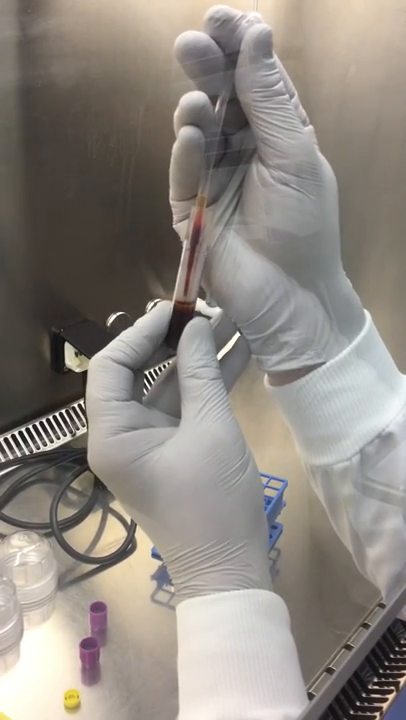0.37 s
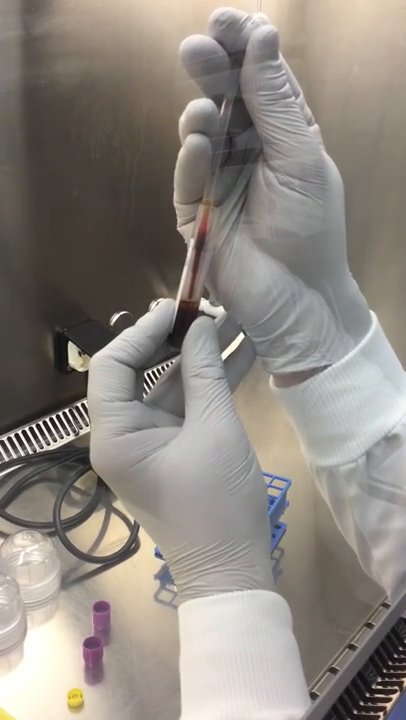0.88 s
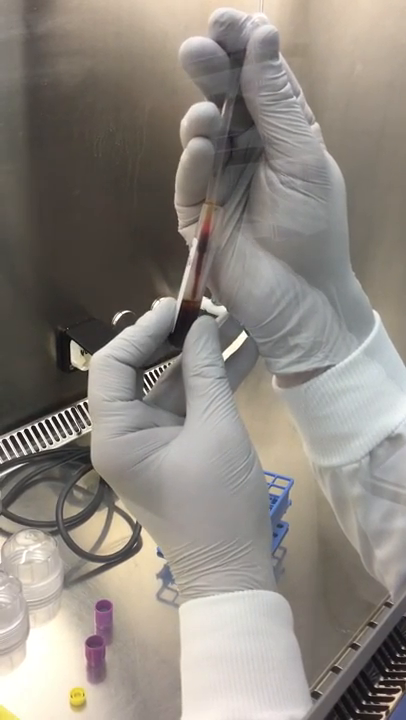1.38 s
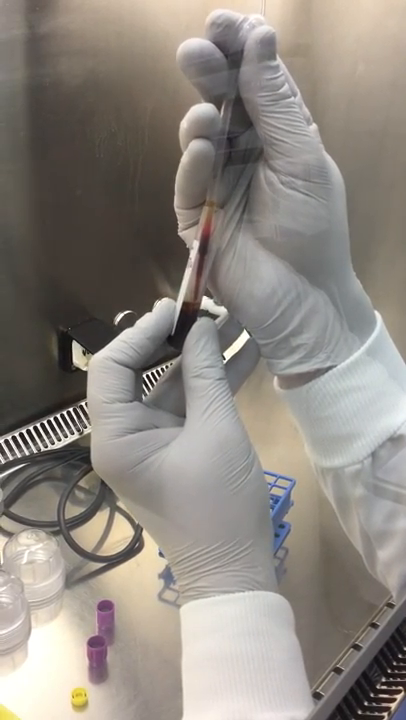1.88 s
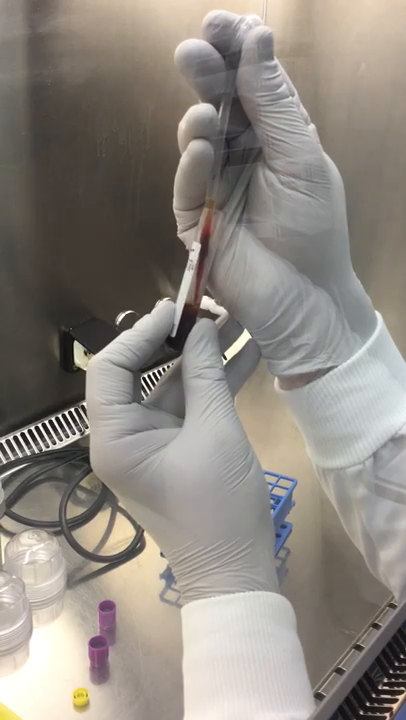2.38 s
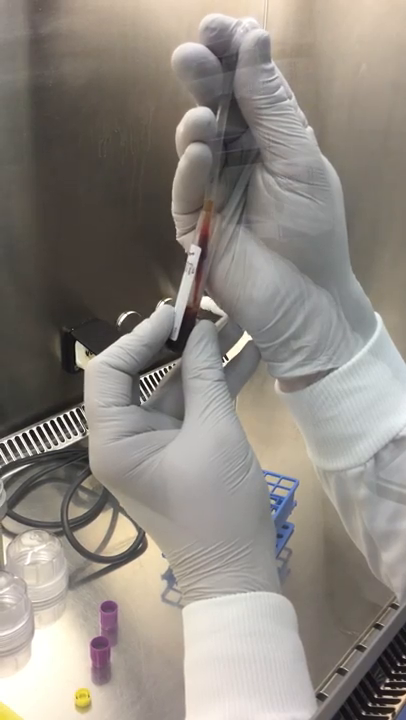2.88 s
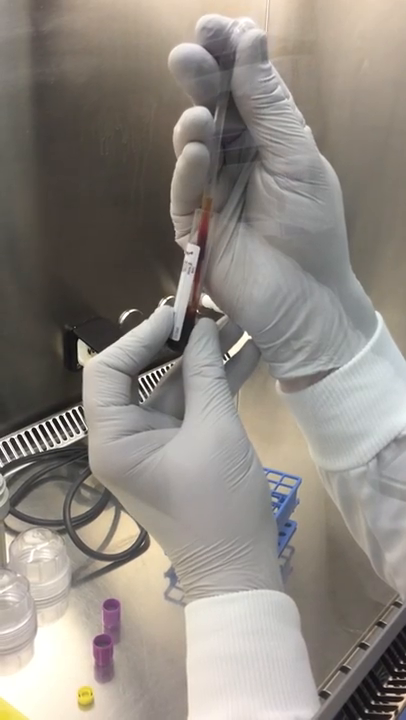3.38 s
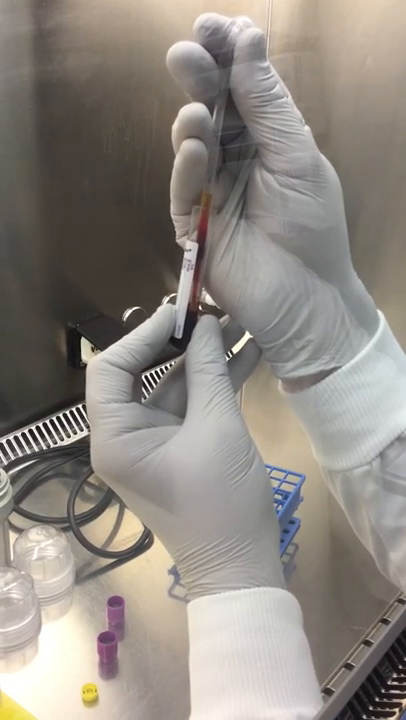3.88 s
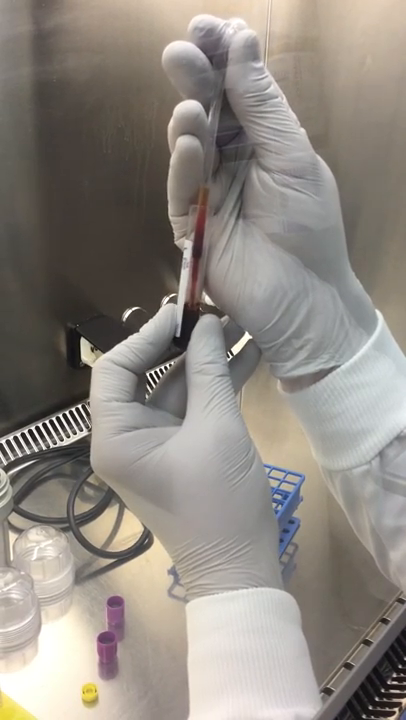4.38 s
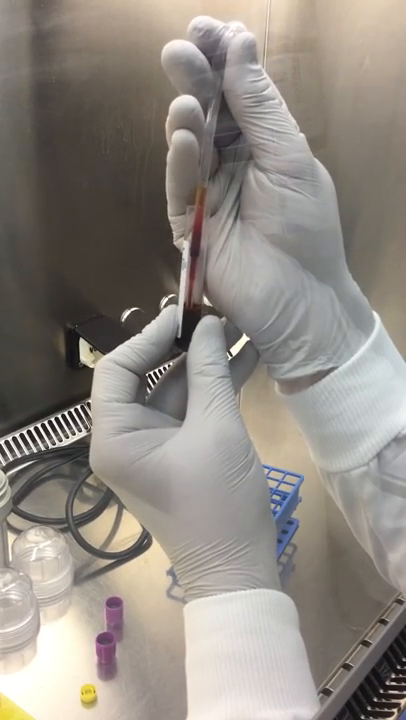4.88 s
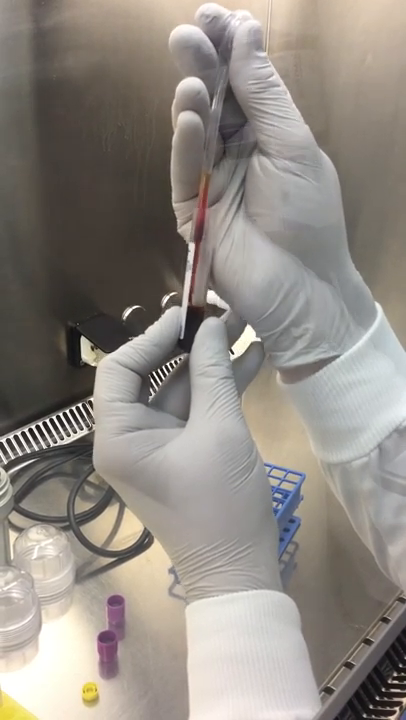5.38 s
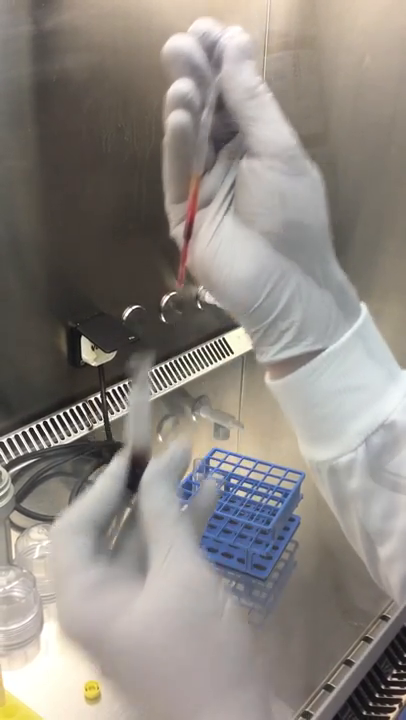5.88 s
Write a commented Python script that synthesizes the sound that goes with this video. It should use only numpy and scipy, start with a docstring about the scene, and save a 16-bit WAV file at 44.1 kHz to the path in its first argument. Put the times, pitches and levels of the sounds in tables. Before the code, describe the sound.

Continuous deep ventilation roar in a metal cabinet, its low hum fluttering unevenly, while faint glove rustles and small clicks barely surface.

```python
"""Blower fan in a steel cabinet

Inside a steel laboratory cabinet a blower fan runs steadily; one microphone hears it all.
Its turbulent air, shaped noise, excites the standing waves of the box: two boom as wavering low notes,
the others colour the rush. The motor electronics add a thin steady whine of sines.
A gloved worker close by adds a faint sleeve rustle of grainy noise and two tiny ringing ticks."""
import sys
import numpy as np
from scipy import signal
from scipy.fft import rfft, irfft, next_fast_len
from scipy.io import wavfile
from scipy.ndimage import uniform_filter1d, map_coordinates

SR = 44100
rng = np.random.default_rng(int(sys.argv[2]) if len(sys.argv) > 2 else 0)


def level_to_linear(level):
    """Convert decibel levels to linear amplitude factors, elementwise."""
    exponent = np.asarray(level, float) / 20
    return 10 ** exponent


def to_wav(s):
    """Save 16-bit WAV."""
    ch = np.atleast_2d(s).T  # columns
    pcm = np.round(np.clip(ch, -1, 1) * 32767)  # PCM
    wavfile.write(sys.argv[1], SR, pcm.astype(np.int16))


N = 275184  # samples, about 6.2 s

# Standing waves of the cabinet that lift the rush, and the nulls between them.
# Each row: frequency in Hz, width in Hz, lift in dB (negative for a null).
CABINET_MODES = [(63, 9.1, 8), (88.5, 12, 9.5), (110.1, 9.8, 8.5), (124.7, 11.7, -9), (144, 32, 3),
                 (209.4, 29, 4.5), (242, 7.5, -3), (260.3, 24, 5), (297.8, 6.7, 8.5), (321.7, 24, 6),
                 (347, 8.8, -2), (364.7, 9.3, 4.5), (377.2, 19, 4.5), (431, 36, 4.5), (491.3, 27.4, 9.5),
                 (522, 8.8, -2), (552, 45, 6), (611, 48, 5.5), (700, 28, 4), (737, 26, 5.5), (780.8, 23, 8),
                 (814, 18, 1.5), (801.6, 69, 6.5), (849, 28, 1.5), (1004, 22, 2), (1050, 16, 4.5),
                 (1113, 29, -1.5), (1368, 230, 3), (1445, 51, -2.5), (1610, 25, 3), (1942, 374, 5),
                 (2390, 240, 3), (3390, 33, 5.5), (4060, 450, 3), (5750, 600, -1), (6600, 670, 2)]
# Air through fan and filter, between the standing waves.
# Each row: frequency in Hz, relative density in dB per Hz.
AIR_SPECTRUM = [(20, -32.5), (35, -23.5), (55, -4), (125, -0.5), (240, -5), (340, -10.5), (670, -20),
                (900, -22), (1500, -26), (2600, -30.5), (3300, -36.5), (4000, -42), (5600, -45.5),
                (8000, -73.5)]
# Thin hiss of the filter and the microphone. Each row: frequency in Hz, relative density in dB per Hz.
HISS_SPECTRUM = [(3000, -20), (6000, 1), (7600, -5.5), (8300, -1), (9400, -3.5), (10100, -7.5),
                 (11000, -7.5), (12000, -9.5), (14300, -15.5), (15500, -15)]
# The two booming standing waves. Each row: frequency in Hz, width in Hz, fuzz level in dB rms,
# waver of pitch in Hz, level of the held note between swells in dB rms before flutter.
BOOM_MODES = [(97.2, 29, -43, 7.04, -42.5), (186, 16, -47, 3.195, -40.5)]
# The strongest swells of either boom.
# Each row: middle in seconds, length in seconds, pitch in Hz, peak in dB.
BOOM_SWELLS = [(0.096, 0.051, 91.5, -26), (0.255, 0.039, 94.7, -27.5), (0.551, 0.04, 103.3, -25.5),
               (0.849, 0.033, 95.9, -27.5), (0.9, 0.11, 183.4, -28), (1.25, 0.059, 103.6, -25),
               (1.438, 0.03, 101, -26), (1.481, 0.081, 187, -31), (1.58, 0.028, 98.6, -26),
               (1.707, 0.079, 182.9, -29), (2.007, 0.055, 182.0, -29.5), (2.122, 0.1, 185.8, -32.5),
               (2.161, 0.034, 94.3, -28.5), (2.536, 0.095, 98.3, -25.5), (2.792, 0.094, 185, -35),
               (2.88, 0.032, 97.2, -29.5), (3.046, 0.05, 190.3, -34), (3.195, 0.12, 105.4, -29),
               (3.2, 0.25, 184.7, -35.5), (3.466, 0.16, 182.8, -30), (3.63, 0.033, 100.6, -25),
               (3.73, 0.045, 186.0, -26.5), (3.873, 0.059, 97.5, -26), (4.085, 0.051, 183.6, -29),
               (4.174, 0.047, 101.9, -29.5), (4.258, 0.056, 188.2, -28), (4.298, 0.024, 97.8, -25.5),
               (4.441, 0.06, 183.6, -30), (4.751, 0.034, 91.8, -25.5), (4.821, 0.145, 184.9, -33),
               (5.168, 0.044, 103.4, -30), (5.299, 0.19, 185.4, -29), (5.393, 0.037, 100.4, -24),
               (5.558, 0.034, 104.5, -27), (5.656, 0.15, 185.9, -32), (5.659, 0.036, 93.75, -26.5),
               (5.816, 0.043, 94.7, -25.5), (6.079, 0.028, 100, -25.5)]
# Thin tones of the motor drive. Each row: frequency in Hz, level in dB rms.
DRIVE_TONES = [(9388, -104), (10786, -106), (14400, -110), (14481, -107), (14580, -112), (14681, -110)]
# Sleeve and glove brushes close by.
# Each row: start in seconds, rise in seconds, hold in seconds, held level in dB.
SLEEVE_BRUSHES = [(0.4, 0.31, .1, -82), (2.25, .11, .01, -85), (5.4, 0.56, .3, -84)]
# Colour of brushed cloth. Each row: frequency in Hz, relative density in dB per Hz.
CLOTH_SPECTRUM = [(6000, -36.5), (9500, -11.5), (11000, 3), (13500, -0.5), (16000, -6.5)]
# Small plastic ticks. Each row: start in seconds, level in dB.
PLASTIC_TICKS = [(.098, -55), (2.395, -44.5)]
# Ringing modes of the plastic.
# Each row: frequency in Hz, relative level in dB, time to fall 60 dB in seconds.
PLASTIC_MODES = [(5450, -3, .004), (9400, -7, .003), (10800, 0, .0035), (11600, -3, .003),
                 (13000, -2.5, .003), (14500, -11, .0025)]

AIR_DB, HISS_DB = -33.5, -77  # rms levels
WAVER_RATE, FLUTTER_RATE = 15, 14  # changes a second of pitch and of level in the booms
FLUTTER_DB = 3.6  # depth of the flutter in level
RUSTLE_FADE_S, RUSTLE_RANGE_DB = 0.12, 13  # release time, and depth of both rise and release


def unit(x):
    """Scale to rms 1."""
    return x / np.sqrt(np.mean(x ** 2) + 1e-20)


def along(points, hz):
    """Read (Hz, value) points on a log frequency axis."""
    f, v = np.transpose(points)
    return np.interp(np.log(hz + 1), np.log(f + 1), v)


def wobble(rate):
    """A smooth random curve through `rate` random knots a second."""
    knots = rng.standard_normal(int(N * rate / SR) + 4)
    return map_coordinates(knots, [np.arange(N) * rate / SR])


def noise(gain_db):
    """Noise of rms 1 whose relative level in dB is a function of frequency."""
    m = next_fast_len(N + 8192)
    hz = np.fft.rfftfreq(m, 1 / SR)
    spectrum = rfft(rng.standard_normal(m)) * level_to_linear(gain_db(hz))
    return unit(irfft(spectrum, m)[:N])


def patchy(x, depth_db):
    """Eddies make loose patches of stronger and weaker hiss in time and pitch."""
    z = signal.stft(x, nperseg=512)[2]
    field = rng.standard_normal(z.shape)
    field = uniform_filter1d(field, size=8, axis=0)  # across pitch
    field = uniform_filter1d(field, size=16, axis=1)  # across time
    patched = signal.istft(z * level_to_linear(depth_db * unit(field)), nperseg=512)[1]
    return unit(patched[:N])


def cabinet_lift(hz):
    """Each standing wave lifts, and each null thins, the air noise near its own frequency."""
    return sum(db * np.exp(-(2 * (hz - mid) / width) ** 2 / 2) for mid, width, db in CABINET_MODES)


def rush():
    """Turbulent air, lifted near each standing wave of the cabinet, with the hiss on top."""
    air = patchy(noise(lambda hz: along(AIR_SPECTRUM, hz) + cabinet_lift(hz)), depth_db=0.71)
    hiss = patchy(noise(lambda hz: along(HISS_SPECTRUM, hz)), depth_db=0.3)
    return level_to_linear(AIR_DB) * air + level_to_linear(HISS_DB) * hiss


def fuzz(hz, width_hz, db):
    """A resonance driven by random air: a narrow band of noise that never settles."""
    return level_to_linear(db) * noise(lambda f: -20 * np.log10(1 + (2 * (f - hz) / width_hz) ** 2))


def held(hz, waver_hz, db):
    """One unbroken note: its pitch drifts from swell to swell and wavers, its level surges in each swell."""
    t = np.arange(N) / SR
    own = np.array([row for row in BOOM_SWELLS if hz / 1.4 < row[2] < hz * 1.4])
    pitch = np.interp(t, own[:, 0], own[:, 2]) + waver_hz * wobble(WAVER_RATE)
    # squared amplitude: the fluttering floor, then the swells added to it
    power = 2 * level_to_linear(db + FLUTTER_DB * wobble(FLUTTER_RATE)) ** 2
    for middle, length, _, peak_db in own:
        power = power + level_to_linear(2 * peak_db) * np.exp(-4 * ((t - middle) / length) ** 2)
    cycles = np.cumsum(pitch) / SR + rng.uniform()
    return np.sqrt(power) * np.sin(2 * np.pi * cycles)


def booms():
    """The two strongest standing waves: each a held, wavering note in a fuzz of its own pitch."""
    return sum(fuzz(hz, width, fuzz_db) + held(hz, waver_hz, held_db)
               for hz, width, fuzz_db, waver_hz, held_db in BOOM_MODES)


def drive():
    """Steady whine of the motor electronics, a sum of pure tones."""
    hz, db = np.transpose(DRIVE_TONES)[:, :, None]
    tones = level_to_linear(db) * np.sin(2 * np.pi * hz * np.arange(N) / SR)
    return np.sqrt(2) * np.sum(tones, axis=0)  # sine peak for the stated rms


def ticks():
    """Plastic parts tick with a very short ring of several modes, and the steel walls answer."""
    out = np.zeros(N)
    t = np.arange(SR // 20) / SR
    onset = 1 - np.exp(-t / 0.0002)
    for start, level_db in PLASTIC_TICKS:
        ring = sum(level_to_linear(db + rng.normal(0, 1.5) - 60 * t / t60) * np.sin(2 * np.pi * hz * t)
                   for hz, db, t60 in PLASTIC_MODES)
        # the answer of the walls falls 60 dB in 12 ms
        echo = level_to_linear(-34 - 60 * t / 0.012) * noise(lambda hz: along(CLOTH_SPECTRUM, hz))[:len(t)]
        out[round(start * SR):][:len(t)] += level_to_linear(level_db) * (ring + echo) * onset
    return out


def brush_gain():
    """Gain of the cloth: each brush rises, holds and lets go; the loudest one counts."""
    t = np.arange(N) / SR
    gains = []
    for start, rise, hold, db in SLEEVE_BRUSHES:
        corners = np.cumsum([start, rise, hold, RUSTLE_FADE_S])
        shape = np.interp(t, corners, [-1, 0, 0, -1], left=-3, right=-3)
        gains.append(level_to_linear(db + RUSTLE_RANGE_DB * shape))
    return np.max(gains, axis=0)


def rustle():
    """Cloth brushes in uneven grains: treble noise with a fast random flutter in level."""
    grains = level_to_linear(1.5 * wobble(150)) * noise(lambda hz: along(CLOTH_SPECTRUM, hz))
    return brush_gain() * unit(grains)


def scene():
    """Fan, cabinet and close worker, heard by one microphone."""
    return (rush() + booms() + drive() + ticks() + rustle())[None]


def band_limit(x):
    """A steep low-pass at the top of the band."""
    return signal.sosfilt(signal.butter(12, 15290, fs=SR, output="sos"), x)


def record(dry):
    """The microphone's mix as the phone stores it."""
    return band_limit(dry)


dry = scene()
out = record(dry)
to_wav(out)
```